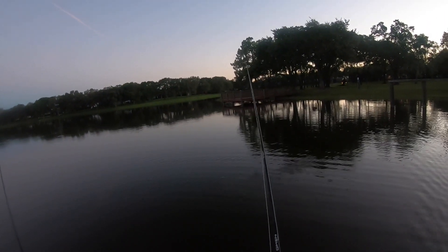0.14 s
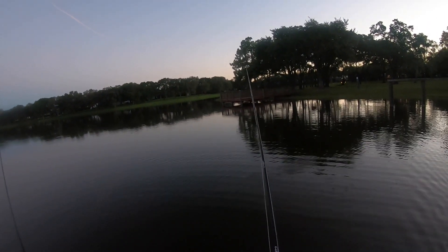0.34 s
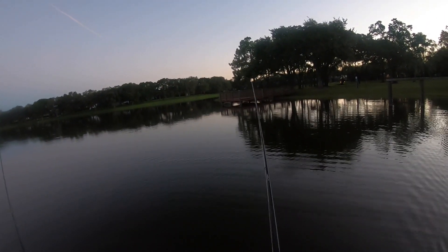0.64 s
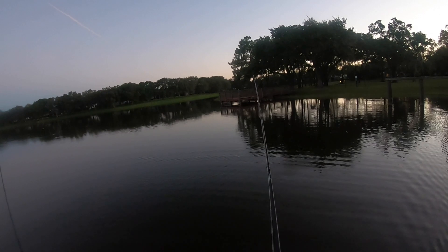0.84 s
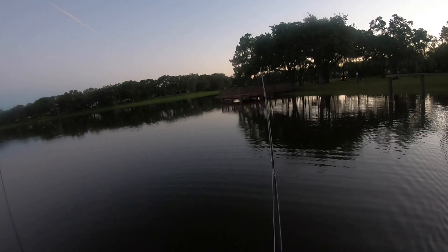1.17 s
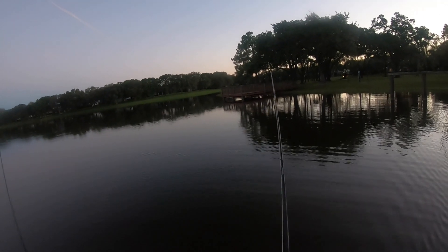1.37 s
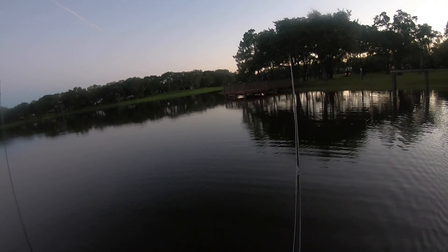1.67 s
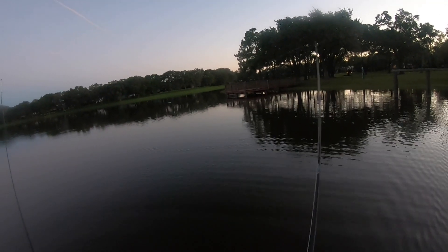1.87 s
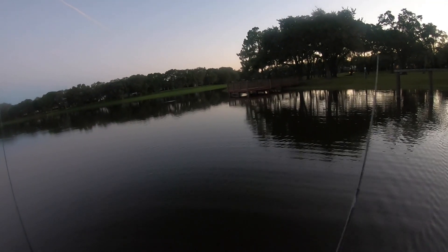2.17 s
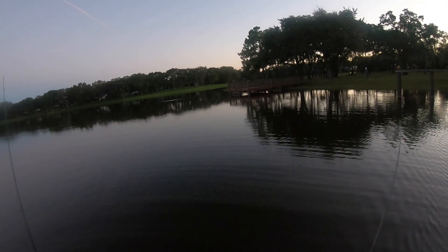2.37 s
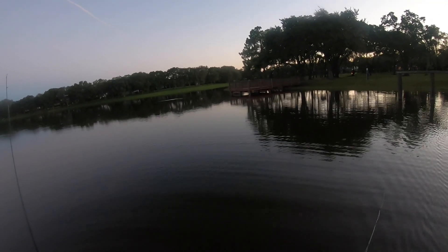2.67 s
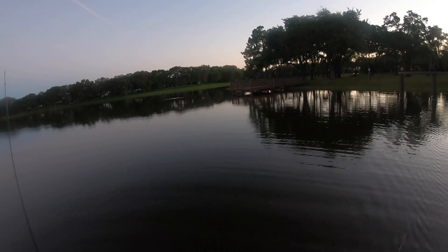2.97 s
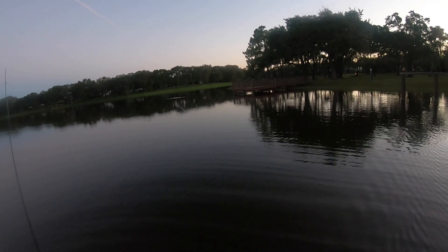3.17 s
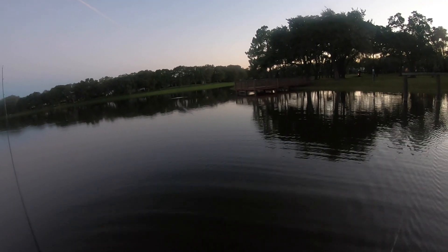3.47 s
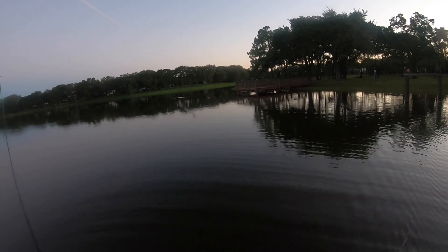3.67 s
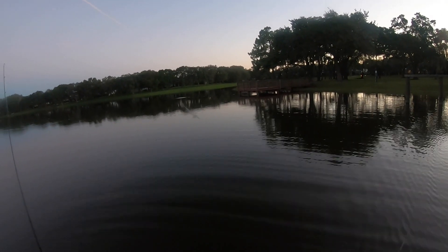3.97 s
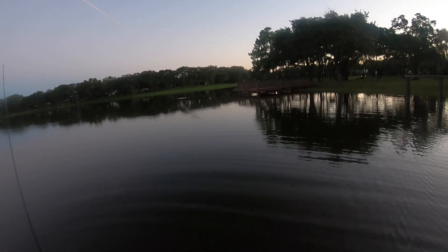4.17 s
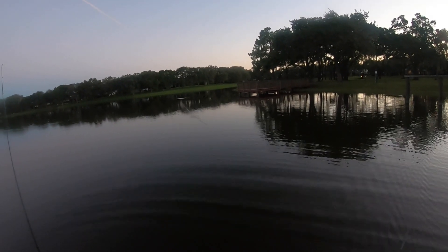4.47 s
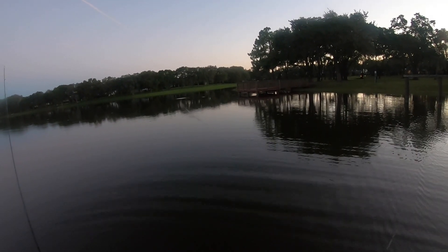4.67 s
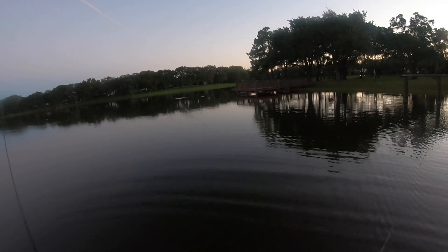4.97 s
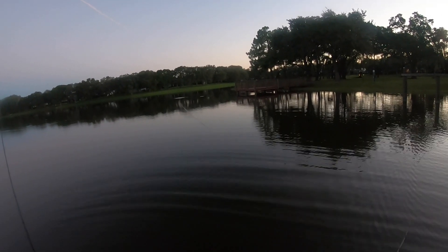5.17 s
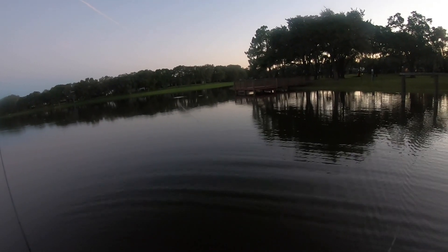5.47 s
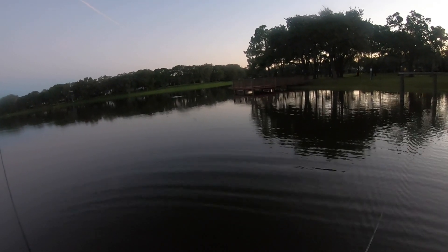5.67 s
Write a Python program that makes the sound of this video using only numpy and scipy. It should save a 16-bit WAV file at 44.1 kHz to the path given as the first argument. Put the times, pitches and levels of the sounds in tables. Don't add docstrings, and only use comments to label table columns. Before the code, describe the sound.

A body-worn microphone, muffled on its left side, hears fishing at a calm lake at dawn. From the start a close reel whines in uneven bursts, falling from a high pitch to a lower one, with raspy line hiss and a dull clothing rustle for the first half second. The whir brakes to a stop around 1.5 s with soft knocks. Small clicks follow from 1.8 s, one firmer near 2.06 s, then a sharp metallic latch snap at 2.3 s and a brief zip of slack line. From 2.8 s quiet winding rubs recur about every third of a second, with faint ticks. A near insect chirps high and steadily from 0.5 s, about four times a second; buzzy trills come at 1.0, 2.7 and 5.7 s. A bird whistles at 1.4 and 2.2 s, then gives downward slides near 3.0, 3.75 and 4.6 s; tiny chips occur, the loudest at 5.65 s. Far crickets and lumpy low traffic rumble continue throughout.

```python
import sys
import numpy as np
from scipy import signal
from scipy.fft import rfft, irfft, next_fast_len
from scipy.io import wavfile
from scipy.ndimage import uniform_filter1d

SR = 44100
rng = np.random.default_rng(int(sys.argv[2]) if len(sys.argv) > 2 else 0)


def magnitude_from_level(level_db):
    exponent = np.asarray(level_db, float) / 20
    return 10 ** exponent


def to_wav(s):
    ch = np.atleast_2d(s).T
    pcm = np.round(np.clip(ch, -1, 1) * 32767)
    wavfile.write(sys.argv[1], SR, pcm.astype(np.int16))


N = 257103
TIME = np.arange(N) / SR
PADDED = next_fast_len(N)


def rms_one(x):
    return x / np.sqrt(np.mean(np.abs(x) ** 2) + 1e-20)


def at_hz(points, column=1):
    table = np.array(points)
    grid = np.fft.rfftfreq(PADDED, 1 / SR)
    return np.interp(np.log(grid + 1), np.log(table[:, 0]), table[:, column])


def coloured(x, points):
    return irfft(rfft(x, PADDED) * magnitude_from_level(at_hz(points)) * np.sqrt(SR / 2), PADDED)[:N]


def wander(rate_hz):
    low = signal.butter(2, rate_hz, fs=SR / 16, output="sos")
    slow = signal.sosfilt(low, rng.standard_normal(N // 16 + 3002))[3000:]
    return np.interp(np.arange(N) / 16, np.arange(len(slow)), rms_one(slow))


def level(rows, column=1):
    table = np.array(rows)
    return magnitude_from_level(np.interp(TIME, table[:, 0], table[:, column], left=-200, right=-200))


def swells(s, hold, db, rise_db_s, fall_db_s):
    coarse = TIME[::64]
    late = coarse - np.array(s)[:, None]
    rise = np.minimum(late, 0) * rise_db_s
    fall = np.maximum(late - hold[:, None], 0) * fall_db_s
    each = np.array(db)[:, None] + rise - fall
    return np.interp(TIME, coarse, each.max(axis=0))


def ring(x, hz, t60):
    r, w = magnitude_from_level(-60 / (t60 * SR)), 2 * np.pi * hz / SR
    return signal.lfilter([0, np.sin(w)], [1, -2 * r * np.cos(w), r * r], x + 1e-18)


def sweep(hz):
    return 2 * np.pi * np.cumsum(hz) / SR


def outdoors(x, left_db, wet_db, t60):
    size = round(.5 * SR)
    fade = magnitude_from_level(-60 * TIME[:size] / t60) * np.minimum(TIME[:size] / 0.008, 1)
    tails = rng.standard_normal((2, size)) * fade
    tails /= np.sqrt(np.sum(tails ** 2, axis=1, keepdims=True))
    wet = signal.fftconvolve(x[None], tails, axes=1)[:, :N]
    return (x + magnitude_from_level(wet_db) * wet) * magnitude_from_level(np.array([[left_db], [0]]))


# time in seconds, pitch in Hz, level in dB.
FREE_SPIN = [
    (0, 8860, -50),
    (.04, 8700, -68.5),
    (.1, 8300, -53),
    (.18, 8080, -57.5),
    (.26, 7160, -55.5),
    (.29, 7000, -71),
]
COASTING_SPIN = [
    (.34, 6700, -72),
    (.37, 6500, -52),
    (.44, 6200, -65),
    (.53, 6090, -53.5),
    (.6, 5680, -61),
    (.69, 5260, -56.5),
    (0.781, 4900, -68),
    (.87, 4850, -58),
    (1.0, 4660, -70),
]
THUMBED_SPIN = [
    (.95, 3623, -66),
    (1.0, 3558, -61),
    (1.22, 3200, -57),
    (1.34, 3070, -57.5),
    (1.4, 2780, -62),
]
SLACK_SPIN = [
    (2.33, 2298, -69),
    (2.4, 2650, -55.5),
    (2.46, 2620, -72.5),
    (2.559, 2755, -77),
]
WHINE_OCTAVE_DB = (-60, -60, -8, -16)


def spool():
    out = np.zeros(N)
    a, b, c = wander(460), wander(460), wander(150)
    for run, octave_db in zip([FREE_SPIN, COASTING_SPIN, THUMBED_SPIN, SLACK_SPIN], WHINE_OCTAVE_DB):
        s, hz, _ = np.transpose(run)
        phase = sweep(np.interp(TIME, s, hz))
        whine = a * np.sin(phase) + b * np.cos(phase)
        octave = magnitude_from_level(octave_db) * c * np.sin(2 * phase)
        out += level(run, column=2) * magnitude_from_level(4) * (whine + octave)
    return out


SLACK_START_S = 2.335


def running():
    stop_db_s, payout_stop_s, slack_stop_s = 400, 1.54, 2.55
    payout = -stop_db_s * np.maximum(TIME - payout_stop_s, 0)
    slack = np.where(TIME < SLACK_START_S, -200, -stop_db_s * np.maximum(TIME - slack_stop_s, 0))
    return np.maximum(payout, slack)


# frequency in Hz, density in dB per Hz.
GEAR_COLOUR = [(500, -45), (900, -15), (1500, -3), (2200, 3), (2900, 0.5), (3700, -2.5), (4300, -3),
               (5600, -14), (7000, -8), (10000, -31.5), (11000, -50)]
# frequency in Hz, density in dB per Hz.
LINE_COLOUR = [(3000, -29), (4500, -15.5), (5600, -1), (7000, -10.5), (8800, 1.5), (10000, -4.5),
               (10800, -21.5), (12000, -39.5)]
# frequency in Hz, density in dB per Hz.
SIZZLE_COLOUR = [(10000, -16), (10800, -0.5), (12500, -3.5), (14000, -6.5), (15000, -7), (15500, -31)]
# time in seconds, rubbing in dB, brightness in dB.
LINE_TUGS = [(0, -71, -4), (.1, -71, -1), (.26, -72.5, 1.5), (.365, -69, 1), (.534, -70.5, 0),
             (.66, -70, 2.5), (.71, -70, 0), (.82, -72, 0.5), (.89, -71.5, 3), (.995, -70, 3.5),
             (1.11, -72.5, 3), (1.2, -69.5, -3), (1.3, -74, 6.5), (1.41, -73, 0), (1.52, -68.5, -12),
             (2.34, -72, 2.5), (2.419, -67.5, -7), (2.54, -73, -10)]
# start in seconds, hold in seconds, rubbing in dB, brightness in dB.
HANDLE_TURNS = [(1.795, .02, -85, -1), (1.832, 0.022, -80, -4), (1.914, 0.074, -79.5, -18),
                (2.076, .01, -73.5, -17), (2.29, .01, -85, -5), (2.85, 0.038, -79, -11),
                (3.124, .05, -83, -12), (3.497, 0.061, -81.5, -6), (3.773, .05, -80, -15),
                (4.096, 0.069, -81, -13), (4.408, 0.036, -82, -5), (4.783, .07, -77.5, -16),
                (5.078, 0.028, -78.5, -16), (5.411, 0.036, -77, -15), (5.714, 0.03, -77, -11)]


def rubbing():
    grains = rng.standard_normal(N) * magnitude_from_level(2.0 * wander(400))
    s, db, bright = np.transpose(LINE_TUGS)
    tug, tug_line = [magnitude_from_level(swells(s, 0 * s, v, rise_db_s=86, fall_db_s=95) + running())
                     for v in (db, db + bright)]
    s, hold, db, bright = np.transpose(HANDLE_TURNS)
    turn, turn_line = [magnitude_from_level(swells(s, hold, v, rise_db_s=253, fall_db_s=500)) for v in (db, db + bright)]
    gears = rms_one(coloured(grains, GEAR_COLOUR)) * magnitude_from_level(12.5) * (tug + turn)
    line = rms_one(coloured(grains, LINE_COLOUR)) * magnitude_from_level(14.5) * (tug_line + turn_line)
    slack_db = (TIME > SLACK_START_S) * (3.5 - 24 * (TIME - SLACK_START_S))
    top_gain = tug_line * magnitude_from_level(-14 + slack_db) + turn_line * magnitude_from_level(-22)
    sizzle = rms_one(coloured(grains, SIZZLE_COLOUR)) * magnitude_from_level(11.0) * top_gain
    return gears + line + sizzle


# frequency in Hz, density in dB per Hz.
CLOTH_COLOUR = [(250, -45), (400, -3.5), (600, -1), (800, 0.5), (1000, -10.5), (1270, -3.5), (1600, -16.5),
                (2500, -49)]
# start in seconds, length in seconds, level in dB, fade in dB.
CLOTH_RUBS = [
    (0, 0.38, -43, 8),
    (4.137, 0.098, -56, 0),
]


def rustle():
    edge_s, depth_db = .14, 40
    gain = np.zeros(N)
    for s, length, db, fade in CLOTH_RUBS:
        end = s + length
        gain += level([(s - edge_s, db - depth_db), (s, db),
                       (end, db - fade), (end + edge_s, db - fade - depth_db)])
    return rms_one(coloured(rng.standard_normal(N), CLOTH_COLOUR)) * gain


# frequency in Hz, width in Hz, level in dB.
ROD_MODES = [(2620, 61, -7), (2854, 40, 0), (3000, 37, -3), (3240, 80, 1), (3655, 37, 1.5), (4890, 81, 1.5),
             (5210, 87, -10.5), (5910, 200, -2.5), (6200, 60, -4.5), (7000, 100, 0), (7430, 63, -1.5),
             (7980, 110, -4.5), (8780, 250, -4.5)]


def through_rod(x):
    out = magnitude_from_level(-3.5) * x
    for hz, width, db in ROD_MODES:
        r = np.exp(-np.pi * width / SR)
        poles = [1, -2 * r * np.cos(2 * np.pi * hz / SR), r * r]
        out = out + magnitude_from_level(db) * signal.lfilter([(1 - r * r) / 2, 0, (r * r - 1) / 2], poles, x)
    return out


# frequency in Hz, level in dB, t60 in seconds.
BODY_MODES = [(857, -10.5, 0.031), (1640, -45, 0.016), (2260, -4, 0.022), (3200, 2, 0.0061)]
# frequency in Hz, level in dB, t60 in seconds.
METAL_MODES = [(4500, -29, 0.0013), (6140, -1.5, 0.0036), (8300, 6, 0.00085), (9360, -4, 0.0035),
               (14200, 6.5, 0.00404)]
# time in seconds, level in dB, brightness in dB, body pitch factor, contact in ms.
HANDLING_CLICKS = [(1.455, -62, -1, 1.2, 1.55), (1.536, -41.5, -19, 0.79, 2.5),
                   (1.553, -47, -23, 0.66, 1.7), (1.798, -66, 10, 1.1, 0.43), (1.833, -54, -11, 1.5, 0.58),
                   (1.844, -73, 5, 0.95, .3), (1.911, -54, -25, 1.6, 0.2), (1.985, -53, -25, 0.96, .5),
                   (2.047, -64, -7, 1.47, 0.39), (2.0615, -35, -14, 1.2, .35),
                   (2.0655, -40.5, -20, 0.73, 1.2), (2.266, -62, -3, 0.87, 0.33)]
LATCH_CLICKS = [
    (2.3022, -51, 7, 1.4, 1.3),
    (2.309, -36, 6.5, 1.2, 0.75),
    (2.3104, -33.5, 4, 1.03, 0.41),
    (2.3136, -32, 9, 1.18, 0.8),
    (2.3151, -20.5, 0.5, 1.01, 0.89),
    (2.320, -38.5, -1, 0.89, 1.7),
    (2.3245, -45.5, 14, 1.1, 1.2),
    (2.3267, -34.5, 0.5, 1, 0.59),
]
WINDING_CLICKS = [
    (3.02, -69, 0, 1.05, .4),
    (3.469, -62, 4, 0.75, 0.31),
    (4.302, -76, 12, 1.2, .3),
    (5.091, -61, -14, .9, 0.97),
    (4.2, -67, -12, 0.88, .6),
]


def clicks():
    out, size = np.zeros(N + SR), round(.06 * SR)
    contacts = HANDLING_CLICKS + LATCH_CLICKS + WINDING_CLICKS
    for s, db, bright_db, pitch, ms in contacts:
        rattle = rng.standard_normal(size) * TIME[:size] * np.exp(-TIME[:size] * 2000 / ms)
        rattle = rattle / np.sqrt(np.sum(rattle ** 2))
        low = sum(magnitude_from_level(g) * ring(rattle, hz * pitch, t60) for hz, g, t60 in BODY_MODES)
        high = sum(magnitude_from_level(g) * ring(rattle, hz, t60) for hz, g, t60 in METAL_MODES)
        at = round(s * SR)
        out[at:at + size] += magnitude_from_level(db + 5) * (low + magnitude_from_level(bright_db) * high)
    band = signal.butter(5, [500, 10300], "band", fs=SR, output="sos")
    return signal.sosfilt(band, out[:N])


def reel():
    near = through_rod(spool() + rubbing() + rustle()) + clicks()
    return outdoors(near, left_db=-.5, wet_db=-17.5, t60=0.075)


# start in seconds, level in dB.
NEAR_CHIRPS = [(.549, -63), (.803, -57.5), (1.05, -58), (1.28, -68), (1.516, -62), (1.7675, -62),
               (2.043, -61), (2.318, -67), (2.523, -60.5), (2.769, -61.5), (3.005, -61.5), (3.28, -62),
               (3.53, -60.5), (3.769, -61), (4.0, -60.5), (4.237, -62), (4.496, -62), (4.745, -59),
               (5.0, -61), (5.262, -60.5), (5.537, -63), (5.812, -61)]
WING_STROKES_DB = [-13, -2, 0.2, 0.9, -1, 0.5, 0]


def chirper():
    gate, stroke = np.zeros(N + SR), np.hanning(round(0.0085 * SR)) ** 0.73
    for s, db in NEAR_CHIRPS:
        for k, stroke_db in enumerate(WING_STROKES_DB):
            at = round((s + 0.01008 * k) * SR)
            gate[at:at + len(stroke)] += magnitude_from_level(db + stroke_db + 5) * stroke
    tone = np.sin(2 * np.pi * 8620 * TIME + 0.92 * wander(90))
    faint_top = magnitude_from_level(-34) * np.sin(2 * np.pi * 15380 * TIME + .6 * wander(150))
    return outdoors(gate[:N] * (tone + faint_top), left_db=4.5, wet_db=-11.5, t60=0.34)


# start in seconds, end in seconds, level in dB.
TRILL_SPANS = [
    (1.014, 1.33, -56.5),
    (2.66, 2.955, -62),
    (5.72, 5.9, -63),
]


def triller():
    swell = sum(level([(a, db - 5.0), (a + 0.11, db), (b, db)]) for a, b, db in TRILL_SPANS)
    strokes = np.sin(np.pi * 125 * TIME) ** 12
    tone = np.sin(2 * np.pi * 7600 * TIME + 1.1 * wander(150))
    return outdoors(1.53 * swell * strokes * tone, left_db=8.5, wet_db=-5, t60=.3)


def whistle(notes, waver):
    out = np.zeros(N)
    for note in notes:
        s, hz, _ = np.transpose(note)
        phase = sweep(np.interp(TIME, s, hz) + 18.3 * waver)
        out += np.sqrt(2) * uniform_filter1d(level(note, column=2), size=120) * np.sin(phase)
    return out * magnitude_from_level(2 * waver[::-1])


EDGE_S, EDGE_DB = .006, 8.5

# start in seconds, length in seconds, from Hz, to Hz, level in dB.
OPENING_NOTES = [
    (2.881, 0.03, 2556, 2633, -62.5),
    (3.636, 0.035, 2664, 2720, -64.5),
    (4.485, .042, 2530, 2577, -64.5),
]


def openings():
    swell_db, flick_s, flick_hz, flick_loss_db = 3.5, 0.014, 420, 22
    return [[(s - EDGE_S, a, db - EDGE_DB - swell_db),
             (s, a, db - swell_db),
             (s + n, b, db),
             (s + n + flick_s, b + flick_hz, db - flick_loss_db)] for s, n, a, b, db in OPENING_NOTES]


# start in seconds, length in seconds, from Hz, to Hz, level in dB.
LONG_NOTES = [
    (3.005, .188, 2540, 2304, -67.5),
    (3.755, 0.21, 2566, 2246, -67),
    (4.608, .24, 2424, 2110, -64.5),
]


def slides():
    drop_s, drop_hz, drop_loss_db = 0.0159, 480, 7
    settle_s, settle_loss_db, fade_db = 0.0294, 4.5, 7.5
    return [[(s - drop_s, a + drop_hz, db - drop_loss_db),
             (s, a, db),
             (s + settle_s, a + .42 * (b - a), db - settle_loss_db),
             (s + n / 2, a + .52 * (b - a), db - settle_loss_db),
             (s + n, b, db - fade_db),
             (s + n + EDGE_S, b, db - fade_db - EDGE_DB)] for s, n, a, b, db in LONG_NOTES]


def edged(s, length, a, b, db):
    end = s + length
    return [(s - EDGE_S, a, db - EDGE_DB), (s, a, db), (end, b, db), (end + EDGE_S, b, db - EDGE_DB)]


# start in seconds, length in seconds, from Hz, to Hz, level in dB.
PLAIN_NOTES = [
    (1.413, .14, 2713, 2560, -62),
    (2.16, .134, 2775, 2555, -66),
]


def plain_notes():
    scoop_s, scoop_hz = 0.018, 59.4
    return [[(s - scoop_s, a - scoop_hz, db - EDGE_DB)] + edged(s, n, a, b, db)[1:]
            for s, n, a, b, db in PLAIN_NOTES]


# start in seconds, length in seconds, from Hz, to Hz, level in dB.
FAINT_NOTES = [
    (2.955, 0.011, 3010, 3030, -71),
    (3.216, 0.09, 2530, 2390, -80.5),
    (3.506, .045, 2980, 3000, -76.5),
    (3.707, 0.028, 3140, 3300, -79),
    (3.99, .08, 2540, 2390, -81),
    (4.551, 0.021, 3120, 2855, -74),
    (4.568, .024, 2810, 2970, -68),
    (4.859, .07, 2440, 2320, -79),
]
# start in seconds, level in dB.
SMALL_CHIPS = [
    (2.953, -68),
    (3.851, -63),
    (5.645, -60),
]


def birds():
    waver = wander(16)
    steady, sliding = openings() + plain_notes(), slides()
    faint = [edged(*row) for row in FAINT_NOTES]
    overtone = [[(s, hz * 3 / 2, db - 17 + less) for s, hz, db in note]
                for group, less in [(steady, 0), (sliding, -10)] for note in group]
    chips = [[(s, 5500, db + 5.0), (s + .006, 6900, db), (s + .011, 7150, db - 1.0), (s + 0.014, 7250, db)]
             for s, db in SMALL_CHIPS]
    song = magnitude_from_level(-3.5) * whistle(steady + sliding + faint, waver)
    return (outdoors(song, left_db=12.0, wet_db=-8, t60=0.6)
            + outdoors(whistle(overtone, waver), left_db=9.0, wet_db=-13.0, t60=.4)
            + outdoors(whistle(chips, 0 * waver), left_db=8, wet_db=-5, t60=0.39))


def chorus():
    out = np.zeros(N)
    pitches = 5800 + 330 * np.tan(np.linspace(-.82, 1.3, num=16))
    for hz, rate, start in zip(pitches, rng.uniform(45, 110, 16), rng.random(16)):
        strokes = np.sin(np.pi * (rate * TIME + start + 0.66 * wander(3.0))) ** 2
        weight_db = -5 * abs(hz - 5800) / 700 + 2.8 * wander(3.4)
        out += magnitude_from_level(weight_db) * strokes * np.sin(2 * np.pi * hz * TIME + 1.9 * wander(80))
    return outdoors(rms_one(out) * magnitude_from_level(-71.5 + 5.5), left_db=-1.0, wet_db=-11.0, t60=0.56)


# frequency in Hz, density in dB per Hz.
AIR_COLOUR = [(22, -78), (40, -69), (64, -74), (110, -70), (200, -77), (400, -85.5), (620, -86), (800, -81),
              (1020, -91), (1290, -91.5), (1600, -99), (2600, -109), (4500, -115), (7600, -112)]


def air():
    colour = AIR_COLOUR + [(10000, -120), (11000, -145)]
    rumble = coloured(rng.standard_normal(N), colour) * magnitude_from_level(.9 * wander(2.2))
    deep = signal.sosfilt(signal.butter(2, 95, fs=SR, output="sos"), rumble)
    hum = magnitude_from_level(-48.5) * wander(5.2) * np.sin(2 * np.pi * 64 * TIME)
    lumps = magnitude_from_level(2.64 * wander(6.7))
    return rumble + (deep + hum) * (lumps - 1) + hum


def scene():
    return reel() + chirper() + triller() + birds() + chorus() + air()


# frequency in Hz, gain in dB, phase in radians.
PORT_RESPONSE = [(60, .2, -.02), (150, 1.4, -.17), (300, 4.0, -.95), (450, 0.1, -2.1), (690, -3, -3.1),
                 (1800, 3.5, -4.1), (2300, -1.5, -5.5), (3500, -7, -5.2), (4300, -12, -6.0),
                 (5000, -17, -7.7), (6500, -13, -8.1), (9000, -28, -9.3), (10500, -18, -7.2),
                 (14000, -16, -10.5)]
# frequency in Hz, density in dB per Hz.
PORT_HISS = [(60, -110), (150, -84.5), (300, -90), (600, -100), (1000, -103), (2200, -107), (4500, -120),
             (7500, -122), (10000, -127), (11500, -145)]


def left_port(x):
    port = magnitude_from_level(at_hz(PORT_RESPONSE)) * np.exp(1j * at_hz(PORT_RESPONSE, column=2))
    return irfft(rfft(x, PADDED) * port, PADDED)[:N] + coloured(rng.standard_normal(N), PORT_HISS)


def low_pass(x):
    return signal.sosfilt(signal.butter(12, 16470, fs=SR, output="sos"), x)


def record(dry):
    top = signal.butter(8, 15800, fs=SR, output="sos")
    mix = signal.sosfilt(top, np.array([left_port(dry[0]), dry[1]]))
    return low_pass(mix)


dry = scene()
out = record(dry)
to_wav(out)
```